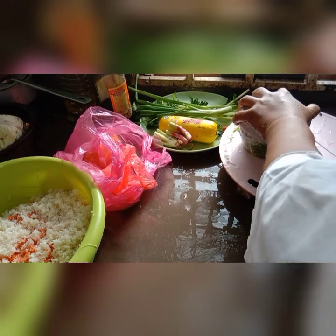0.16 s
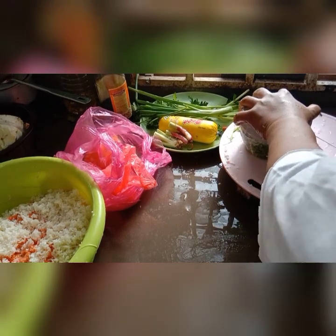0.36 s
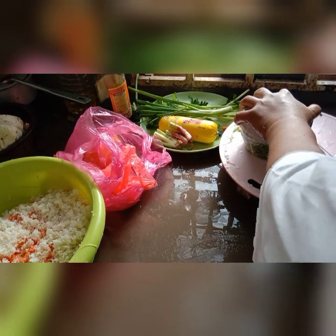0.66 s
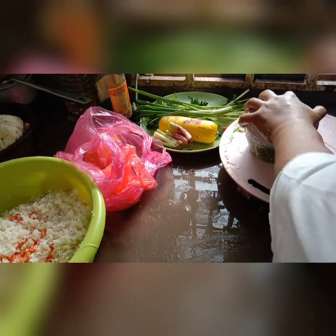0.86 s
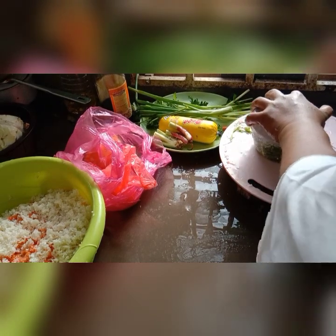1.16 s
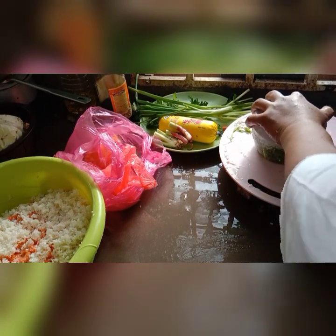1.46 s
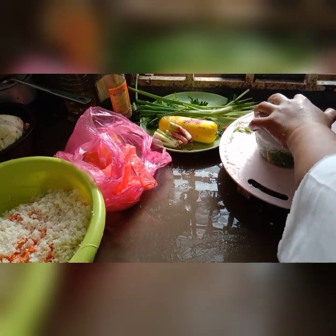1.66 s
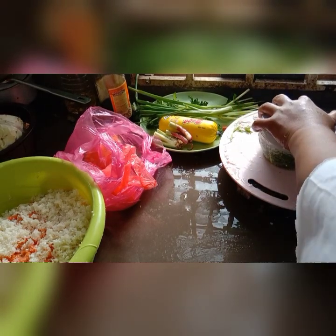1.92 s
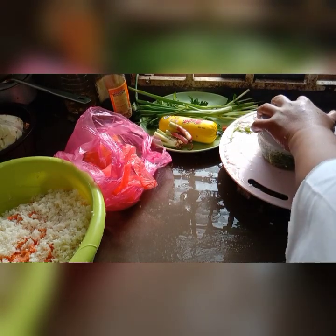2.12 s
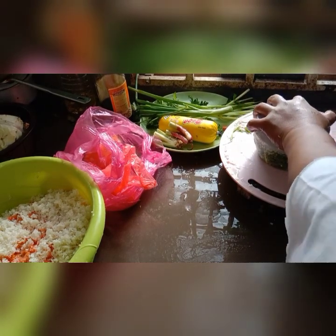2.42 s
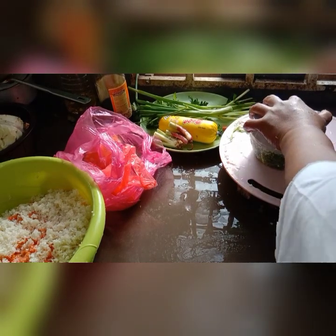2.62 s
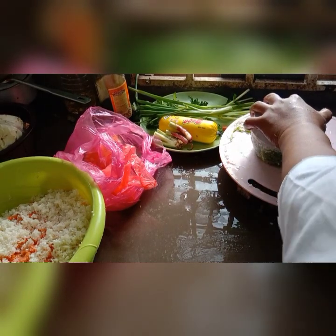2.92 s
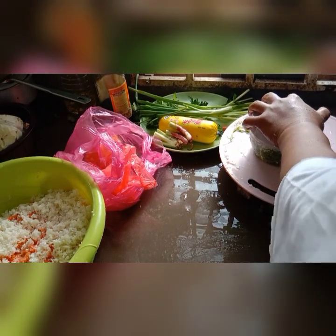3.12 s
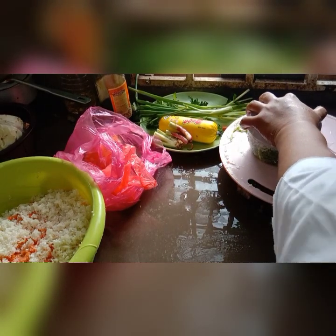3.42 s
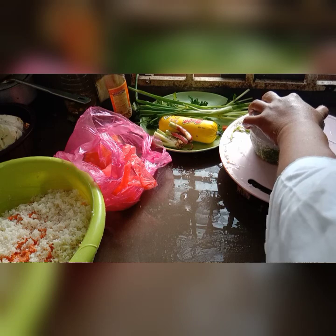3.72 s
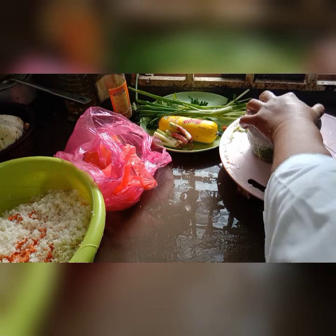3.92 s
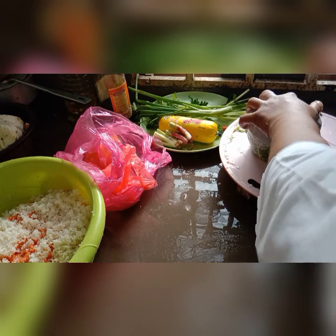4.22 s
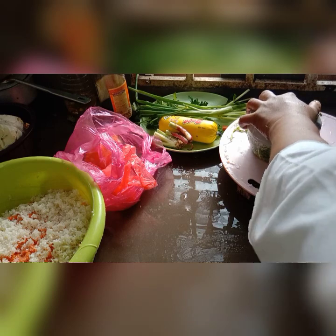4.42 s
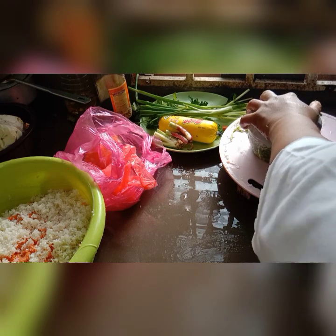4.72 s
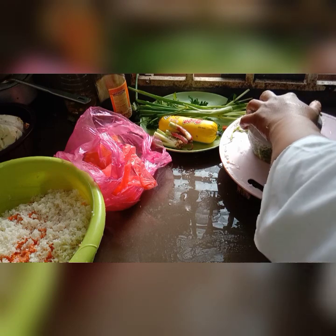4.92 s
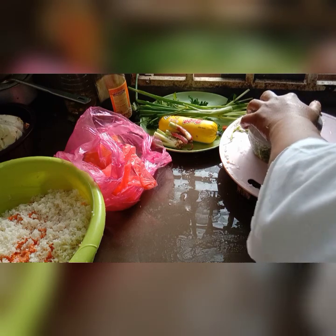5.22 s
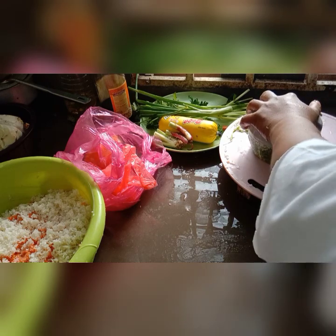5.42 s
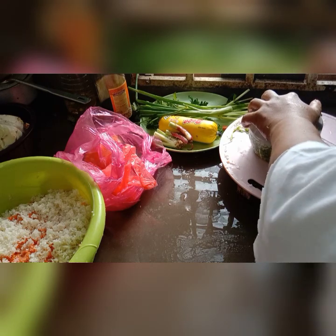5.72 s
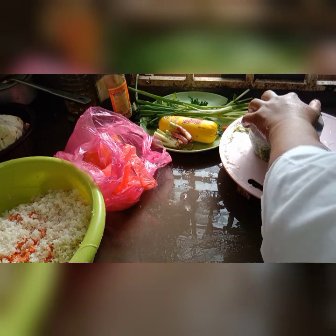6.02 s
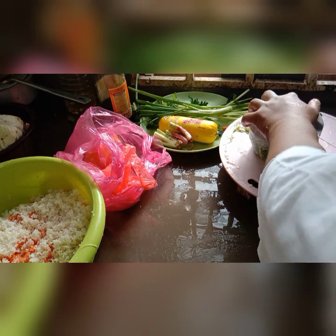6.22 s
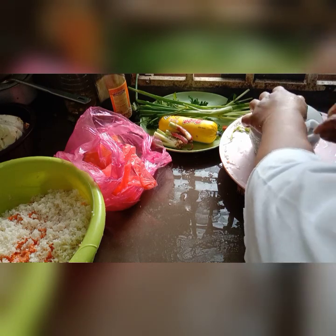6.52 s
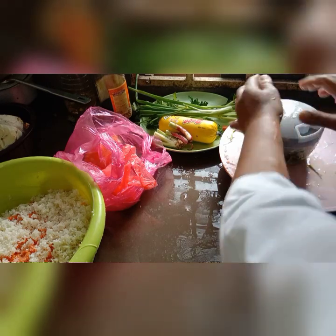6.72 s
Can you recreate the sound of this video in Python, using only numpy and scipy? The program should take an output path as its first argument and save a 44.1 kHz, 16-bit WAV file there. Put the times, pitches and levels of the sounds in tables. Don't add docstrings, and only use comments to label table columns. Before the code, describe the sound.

Close single-microphone sound of manual chopping in a live little kitchen. A heavy crunching pull alternates with a lighter, metallic, ticking recoil, forming an even back-and-forth rhythm of roughly two cycles per second. Hard pieces strike the thin plastic bowl unevenly, its base thudding on the board. Water spray hisses constantly further off. Near the end the mechanism runs down, there is a brief gap, then a cluster of hollow plastic knocks as the lid is freed.

```python
import sys
import numpy as np
from scipy import signal
from scipy.fft import rfft, irfft
from scipy.io import wavfile

SR = 44100
rng = np.random.default_rng(int(sys.argv[2]) if len(sys.argv) > 2 else 0)


def gain_from_db(level_db):
    decades = np.asarray(level_db, float) / 20
    return 10 ** decades


def to_wav(sig):
    pcm = np.clip(np.atleast_2d(sig), -1, 1) * 32767
    pcm = np.round(pcm).astype(np.int16)
    wavfile.write(sys.argv[1], SR, pcm.T)


N = 302526
STEP = 32


def level(x, db):
    return x * gain_from_db(db) / np.sqrt(np.mean(x ** 2))


def curve(table):
    s, *columns = np.transpose(table)
    return [np.interp(np.arange(N) / SR, s, c) for c in columns]


def ring(x, modes):
    out = 0
    for k, (hz, width_hz, db) in enumerate(modes):
        section = np.concatenate(signal.iirpeak(hz, hz / width_hz, SR))
        out = out + (-1) ** k * gain_from_db(db) * signal.sosfilt([section, section], x)
    return out


def colour(x, spectrum):
    hz, db = np.transpose(spectrum)
    log_hz = np.log(np.fft.rfftfreq(N, 1 / SR) + 1)
    gain = gain_from_db(np.interp(log_hz, np.log(hz), db, left=-90))
    return irfft(rfft(x) * gain, N)


def grains(per_s, spread_db):
    place, strength, sign = rng.random((3, N // 4))[:, :int(per_s * N / SR)]
    strength_db = spread_db * np.minimum(-np.log(strength), 4)
    out = np.zeros(N)
    out[(place * N).astype(int)] = gain_from_db(strength_db) * (2 * sign - 1)
    return out


def walk(rate_hz):
    steps = rng.standard_normal(N // 64)
    return np.interp(np.arange(N) * rate_hz / SR, np.arange(len(steps)), steps)


def bursts(times_s, db, t60_s):
    spikes = np.zeros(N)
    np.add.at(spikes, (np.asarray(times_s) * SR).astype(int), gain_from_db(db))
    fade = signal.lfilter([1], [1, -np.exp(-np.log(1000) / (t60_s * SR))], spikes)
    return fade * rng.standard_normal(N)


def add_knock(out, s, db, modes, t60_s, click):
    t = np.arange(SR // 10) / SR
    chatter = rng.standard_normal(len(t)) * gain_from_db(-60 * t / t60_s)
    blow = chatter + click * (t < 3 / SR)
    start = int(s * SR)
    out[start:start + len(t)] += gain_from_db(db) * ring(blow, modes)[:N - start]


def effort(start_s, attack_s, climb_s, climb_db, length_s, sag_db_s, release_db_s):
    t = np.arange(0, N, STEP) / SR - start_s
    corners_s = [-attack_s, attack_s, max(climb_s, attack_s + 1 / SR)]
    rise = np.interp(t, corners_s, [-39.5 - climb_db, -climb_db, 0])
    sag = sag_db_s * np.clip(t - climb_s, 0, None)
    release = release_db_s * np.clip(t - length_s, 0, None)
    return rise - sag - release


# (time [s], hiss [dB])
TAP_FLOW = [(0.0, -24), (0.4, -23.5), (1.22, -23.5), (1.39, -24), (1.89, -24.5), (2.75, -24), (3.3, -25.5),
            (3.82, -23.5), (4.25, -24.5), (4.72, -21), (4.85, -24), (5.3, -23), (5.58, -26.5), (5.86, -22),
            (6.31, -25), (6.86, -23)]
# (frequency [Hz], density [dB/Hz])
SPRAY_SPECTRUM = [(1000, -47), (1200, -44), (1400, -8), (1900, -30), (2500, -2.5), (3050, 6.5), (3500, 13),
                  (3800, -3), (4500, -1.5), (5200, -7.5), (6000, -10.5), (8400, -19), (13400, -25),
                  (16000, -12)]


def tap(hiss_db):
    spray = colour(rng.standard_normal(N) + 0.069 * grains(3000, 1.7), SPRAY_SPECTRUM)
    hollow = ring(spray, [(3107, 190, -12.5), (3300, 92, -24), (5400, 1500, -2.5)])
    spray = spray + 2.36 * hollow
    return level(spray * gain_from_db(2.0 * walk(16)), hiss_db - 3.5)


# (frequency [Hz], density [dB/Hz])
HUM_SPECTRUM = [(15, -30), (25, 35), (134, 29), (190, 36), (523, -24), (566, -28), (695, -3), (1100, -43),
                (1430, -37), (2420, -120)]


def hum():
    return level(colour(rng.standard_normal(N), HUM_SPECTRUM), -62)


# (start [s], time to full force [s], length [s], bowl rumble [dB], chopping crunch [dB])
PULLS = [(-0.06, .04, 0.059, -29, -21), (0.037, 0.064, 0.14, -27.5, -21.5),
         (0.471, 0.089, 0.2, -27.5, -24.5), (0.962, 0.15, .19, -25.5, -22),
         (1.429, 0.12, 0.22, -31.5, -25.5), (1.975, 0.15, 0.18, -31, -23.5), (2.478, 0.11, 0.19, -30, -24),
         (2.94, 0.11, .18, -28.5, -21.5), (3.422, .13, 0.2, -27.5, -20.5), (3.933, 0.11, .16, -31, -23.5),
         (4.401, .13, .2, -28.5, -27), (4.936, 0.093, 0.18, -27.5, -23), (5.44, 0.16, 0.22, -28.5, -25),
         (5.949, 0.026, 0.18, -29.5, -25.5)]
BITE_S, CLIMB_DB, PULL_SAG_DB_S = 0.017, 11.5, 7.5
LET_GO_DB_S, BOARD_LET_GO_DB_S = 135, 145
PULL_RATTLE_DB, PULL_SCRAPE_DB = -11.5, -0.5


def pull_power():
    power = 0
    for s, full_s, length_s, rumble_db, crunch_db in PULLS:
        heavy = effort(s, BITE_S, full_s, CLIMB_DB, length_s, PULL_SAG_DB_S, BOARD_LET_GO_DB_S)
        light = effort(s, BITE_S, full_s, CLIMB_DB, length_s, PULL_SAG_DB_S, LET_GO_DB_S)
        power = power + gain_from_db(2 * np.array([
            rumble_db + heavy,
            crunch_db + light,
            crunch_db + PULL_RATTLE_DB + light,
            crunch_db + PULL_SCRAPE_DB + light]))
    return power


# (time [s], peak [dB], thump re peak [dB], wall pitch [Hz])
BLOWS = [(0.039, -2, -11, 1150), (0.094, 0, -12, 1300), (0.112, 0.5, -4, 820), (0.274, -1, -24, 1400),
         (0.506, -7.5, -10, 730), (0.64, 2, -6, 1450), (1.039, 1, -14, 1440), (1.084, -1.5, -29, 724),
         (1.499, 1, -19, 1460), (1.555, -8, -11, 784), (1.986, -5.5, -27, 1390), (2.07, 0, -24, 1520),
         (2.118, 7, -19, 1500), (2.529, -3, -14, 1370), (2.604, 2.5, -12, 745), (2.755, -2.5, -9, 1150),
         (2.994, -13.5, -9.5, 1160), (3.238, -0.5, -15, 1450), (3.449, -7, -1, 1720), (3.483, 2, -9, 1130),
         (3.524, -10, 2, 1130), (3.585, -6, -3, 1510), (4.009, 2, -17, 1420), (4.078, 2, -15, 1550),
         (4.493, -4.5, -4, 706), (4.62, 0.5, -29, 1280), (4.696, -21, -2, 1440), (5.527, 3.5, -15, 1370),
         (5.619, -3, -19, 726), (5.978, -15, 2, 1210)]
# (frequency [Hz], width [Hz], level [dB])
BOWL_MODES = [(66, 90, -27), (119, 59, -16.5), (168, 32, -12.5), (202.4, 38, -7), (230, 44, -4.5),
              (269.8, 40, 1.5), (323, 94, -7.5), (406, 109, -7), (491, 118, -6), (567.4, 103, -10.5)]
# (frequency [Hz], width [Hz], level [dB])
WALL_MODES = [(735, 158, 0), (866, 126, -4), (1005, 150, -4.5), (1185, 210, 0.5), (1440, 275, 0.5),
              (1700, 210, -4.5), (1993, 440, -9.5), (3260, 1170, -8.5), (5670, 2660, -16)]
BEND_S = .003


def patchy_modes(slaps, modes):
    return [ring(slaps + grains(600, 3.48), [mode]) * gain_from_db(2.0 * walk(14)) for mode in modes]


def bowl(rumble_db, crunch_db):
    slaps = grains(700, 2.68)
    low = patchy_modes(slaps, BOWL_MODES)
    high = patchy_modes(slaps, WALL_MODES)
    touch = gain_from_db(0.17 * np.minimum(crunch_db + 24.5, 0))
    third_touch = gain_from_db(0.66 * np.minimum(crunch_db + 26.5, 0))
    wall = touch * (high[0] + high[1] + third_touch * high[2]) + sum(high[3:])
    bent = np.arange(N) + BEND_S * SR * walk(7)
    wall = np.interp(bent, np.arange(N), wall)
    out = level(sum(low), rumble_db + 0.5) + level(wall, crunch_db + 1.5)
    for s, peak_db, thump_db, hz in BLOWS:
        add_knock(out, s, peak_db + 1, [(hz, 350, 0), (1450, 900, -6), (3300, 900, -14)], .035, 2.2)
        add_knock(out, s, peak_db + thump_db + 5.0, BOWL_MODES[3:9], .045, 3.0)
    return out


# (start [s], length [s], steel rattle [dB], bowl shake [dB], housing scrape [dB])
RECOILS = [(0.238, 0.21, -23, -33.5, -21.5), (0.74, 0.2, -21, -32.5, -23),
           (1.207, 0.2, -21.5, -32.5, -17.5), (1.715, 0.2, -22, -33, -20), (2.221, .2, -21, -33, -19.5),
           (2.717, 0.18, -21, -33, -19), (3.198, .18, -21, -33, -17.5), (3.667, .19, -20.5, -34.5, -19.5),
           (4.157, .2, -23, -33, -14.5), (4.665, .22, -24, -33.5, -21.5), (5.206, 0.22, -25.5, -35.5, -23),
           (5.721, 0.19, -24, -35.5, -22.5), (6.235, 0.28, -27.5, -39.5, -20)]
CATCH_S, RATTLE_RUNDOWN_DB, SCRAPE_SAG_DB_S, STOP_DB_S = 0.033, 10.5, 49, 213
SHAKE_RISE_S, SHAKE_SAG_DB_S, CRUNCH_RUNDOWN_DB, SHAKE_CRUNCH_DB = 0.059, 58, 15.5, 6


def recoil_power():
    power = 0
    for s, length_s, rattle_db, shake_db, scrape_db in RECOILS:
        crunch_sag_db_s = CRUNCH_RUNDOWN_DB / length_s
        rattle_sag_db_s = RATTLE_RUNDOWN_DB / length_s
        shake = effort(s, CATCH_S, SHAKE_RISE_S, 1.3, length_s - .03, SHAKE_SAG_DB_S, STOP_DB_S)
        crunch = effort(s, CATCH_S, SHAKE_RISE_S, 1.5, length_s, crunch_sag_db_s, STOP_DB_S)
        rattle = effort(s, CATCH_S, CATCH_S, 0, length_s, rattle_sag_db_s, STOP_DB_S)
        scrape = effort(s, CATCH_S, SHAKE_RISE_S, 1.3, length_s, SCRAPE_SAG_DB_S, STOP_DB_S)
        power = power + gain_from_db(2 * np.array([
            shake_db + shake,
            shake_db + SHAKE_CRUNCH_DB + crunch,
            rattle_db + rattle,
            scrape_db + scrape]))
    return power


# (time [s], peak [dB], snap re peak [dB])
TICKS = [(0.113, -12, -0.5), (0.1817, -10, -11), (0.27, -4, -15), (0.3387, -15.5, 2.5), (0.6527, -11, -7),
         (0.756, -3, -24), (1.1653, -8, -8), (1.2363, -2, -19), (1.4507, -9, -5), (1.744, -2, -28),
         (1.7935, -2, -18), (1.836, -10, -11), (1.975, -12, -5), (2.2273, -7, -16), (2.4583, -15, -6),
         (2.6853, -14, -20), (2.7397, -15, -6), (2.7715, -2.5, -10), (3.016, -10, -21), (3.2131, -16, -11),
         (3.2347, -1, -20), (3.706, -1, -17), (3.793, -7.5, -10.5), (4.087, -8, -20), (4.186, -10, -7),
         (4.6224, -15.5, -2), (5.2264, -10, -11), (5.3108, -5.5, -8.5), (5.7394, -23, 5),
         (5.9767, -7.5, -7)]
# (frequency [Hz], width [Hz], level [dB])
STEEL_MODES = [(6500, 310, -15.5), (7200, 200, -13), (7470, 550, -15), (8320, 270, -1), (8630, 410, 1.5),
               (9770, 260, -9.5), (10500, 610, -25), (11200, 480, -21), (11910, 460, -7), (12600, 600, -18),
               (13600, 1400, -20), (14400, 350, -16), (15200, 400, -17), (15250, 320, -8)]
# (frequency [Hz], width [Hz], level [dB])
LID_MODES = [(2600, 670, 7.5), (3430, 1000, 1), (4300, 880, 1), (5360, 1340, 5), (5860, 570, 12),
             (6940, 1900, -4), (8400, 500, -20)]
# (frequency [Hz], density [dB/Hz])
SCRAPE_SPECTRUM = [(1200, -24.5), (1600, -6), (2100, -3.5), (3400, -0.5), (4200, -5), (5600, -3),
                   (7500, -12), (10000, -21.5), (16000, -31)]


def clutch(rattle_db, scrape_db):
    uneven = gain_from_db(0.88 * walk(90))
    steel = sum(ring(grains(3000, 3.7) * uneven, [mode]) for mode in STEEL_MODES)
    crackle = colour(grains(2500, 2.4) * uneven, [(5000, -36), (7500, 6), (16000, -5)])
    steel_db = rattle_db + 0.3 * (rattle_db + 22.5)
    rattle = level(steel, steel_db) + level(crackle, rattle_db - 5.5)
    rub = colour(grains(9000, 3.75), SCRAPE_SPECTRUM)
    scrape = level(rub * gain_from_db(2.5 * walk(22)), scrape_db - 5.0)
    s, peak_db, snap_db = np.transpose(TICKS)
    ticks = ring(bursts(s, peak_db + 0.5, 0.033), STEEL_MODES[:9])
    snaps = ring(bursts(s, peak_db + snap_db - 2.5, 0.086), LID_MODES[:4])
    return rattle + scrape + ticks + snaps


# (start [s], length [s])
LID_SLIDE = (6.582, 0.066)
# (rumble [dB], crunch [dB], rattle [dB], scrape [dB])
LID_SLIDE_DB = (-50, -35, -36, -20)


def lid_slide_power():
    start_s, length_s = LID_SLIDE
    slide = effort(start_s, .008, 0.03, 3, length_s, 30, 240)
    return gain_from_db(2 * (np.array(LID_SLIDE_DB)[:, None] + slide))


# (time [s], peak [dB], pitch [Hz], brightness [dB])
KNOCKS = [
    (6.5882, -11, 1330, -2),
    (6.603, -12, 1600, -1),
    (6.6093, -7.5, 1340, -4.5),
    (6.618, -9, 1500, -8),
    (6.6265, -8.5, 1090, -24),
    (6.642, -20, 960, -18),
    (6.665, -23, 880, -14),
    (6.69, -27, 850, -14),
    (6.73, -20, 2840, -16),
]


def lid():
    out = np.zeros(N)
    for s, peak_db, hz, bright_db in KNOCKS:
        add_knock(out, s, peak_db + 7.5, [(hz, 300, 0), (1.4 * hz, 500, -3)], .035, 3.0)
        add_knock(out, s, peak_db + bright_db + 0.5, LID_MODES, .025, 2.5)
    return out


# (rumble [dB], crunch [dB], rattle [dB], scrape [dB])
REST_LAYERS_DB = (-63, -50.5, -44, -26)


def hand():
    rest = gain_from_db(2 * np.array(REST_LAYERS_DB))[:, None]
    power = rest + pull_power() + recoil_power() + lid_slide_power()
    return [np.interp(np.arange(N), np.arange(0, N, STEP), db) for db in 10 * np.log10(power)]


def room(near):
    t60_s, tail_db, gap_s = .14, -11, .004
    t = np.arange(SR // 2) / SR
    tail = rng.standard_normal(len(t)) * gain_from_db(-60 * t / t60_s) * (t > gap_s)
    tail = level(tail, tail_db) / np.sqrt(len(t))
    return signal.fftconvolve(near, tail)[:N]


def scene():
    rumble_db, crunch_db, rattle_db, scrape_db = hand()
    near = bowl(rumble_db, crunch_db) + clutch(rattle_db, scrape_db) + lid()
    mono = near + room(near) + tap(*curve(TAP_FLOW)) + hum()
    return np.array([mono, mono])


def band_limit(x):
    return signal.sosfilt(signal.butter(12, 16890, fs=SR, output="sos"), x)


def record(dry):
    top_hz, drive = 15500, 1.1
    thin = signal.sosfilt(signal.butter(2, 70, "high", fs=SR, output="sos"), dry)
    soft = np.tanh(drive * thin) / drive
    edge = signal.ellip(12, .3, 80, top_hz, fs=SR, output="sos")
    return band_limit(signal.sosfilt(edge, soft))


dry = scene()
out = record(dry)
to_wav(out)
```